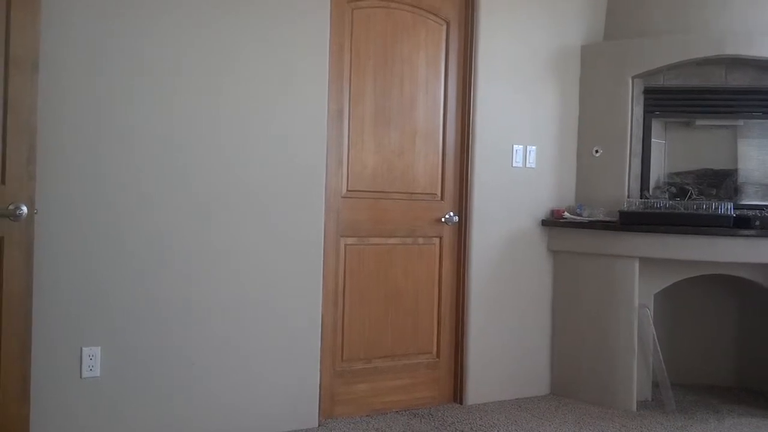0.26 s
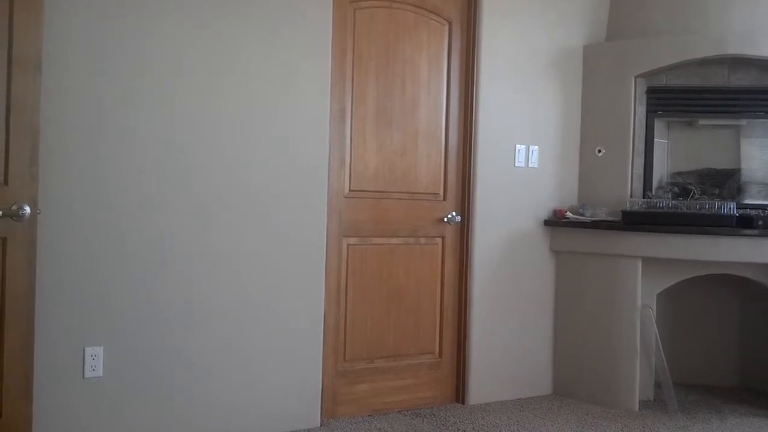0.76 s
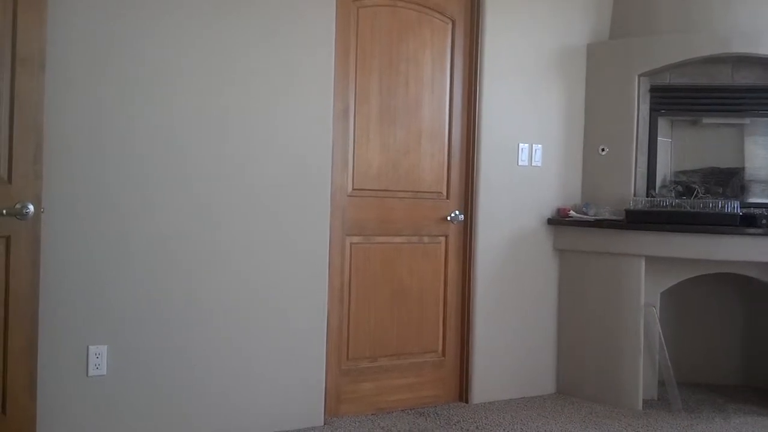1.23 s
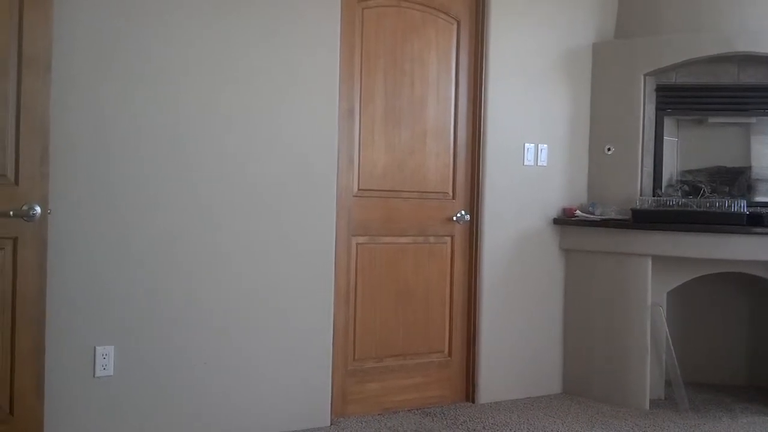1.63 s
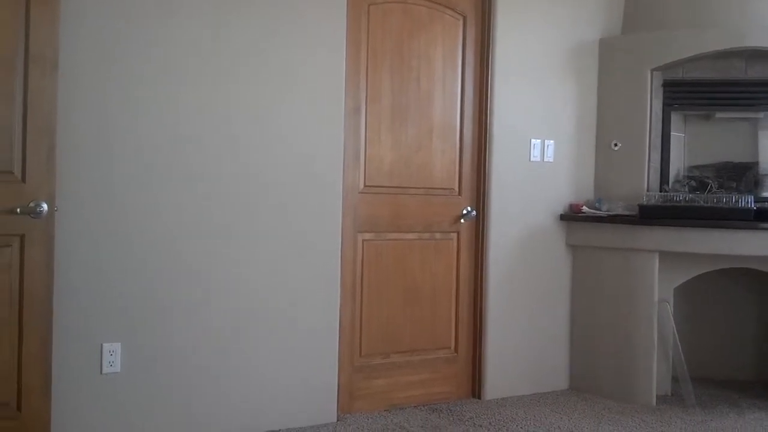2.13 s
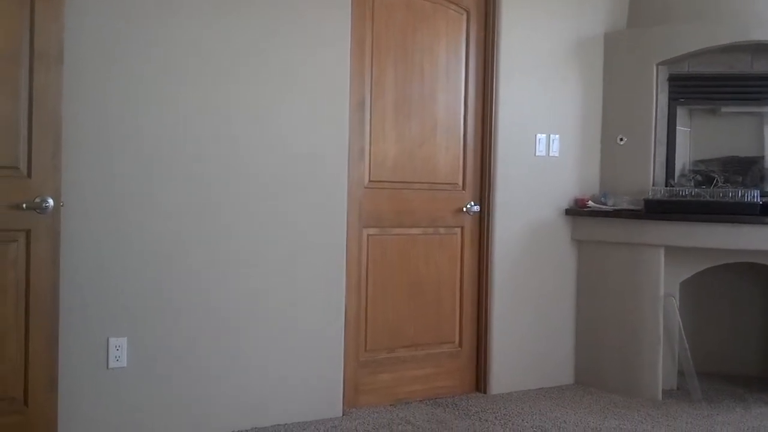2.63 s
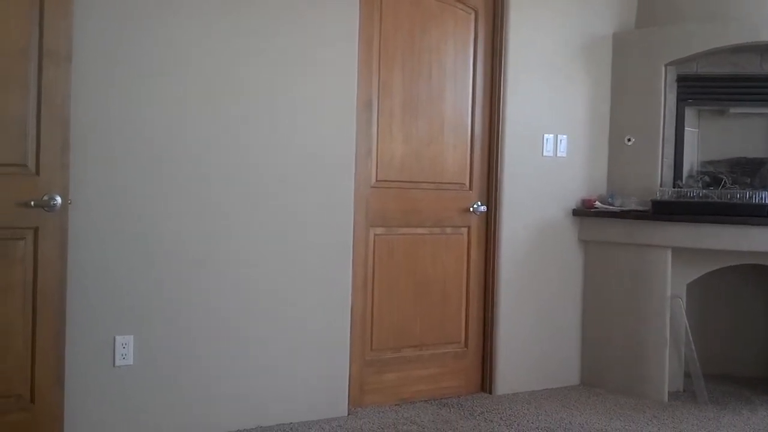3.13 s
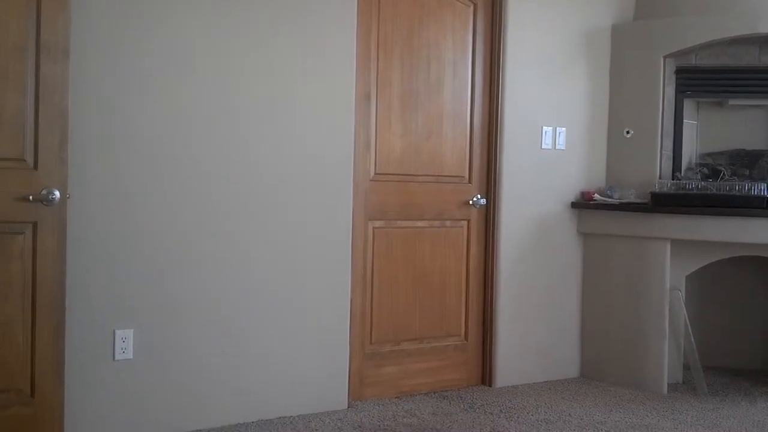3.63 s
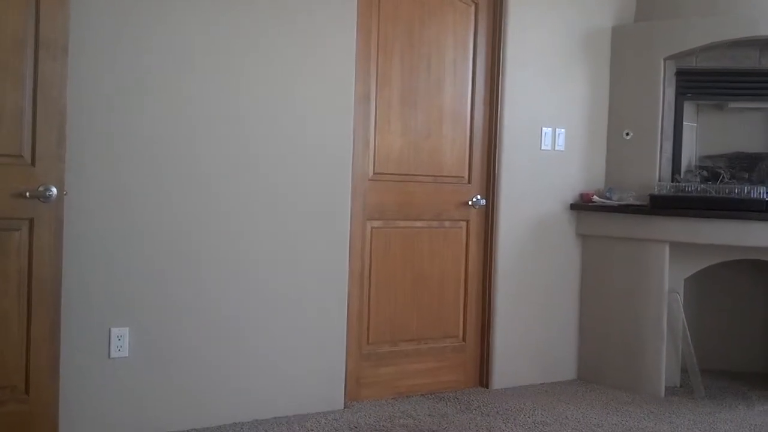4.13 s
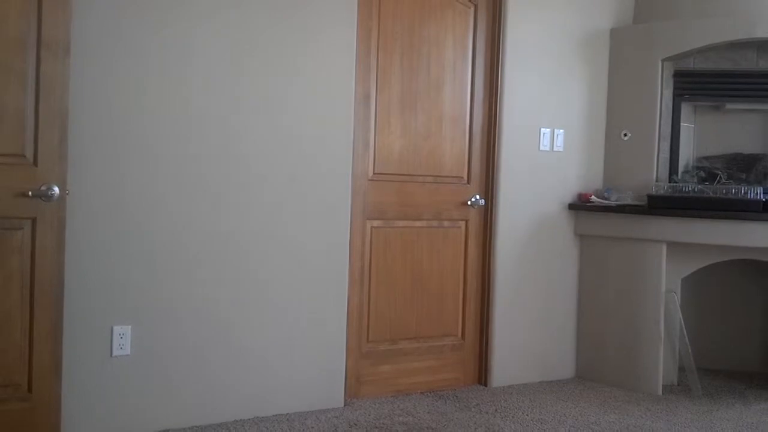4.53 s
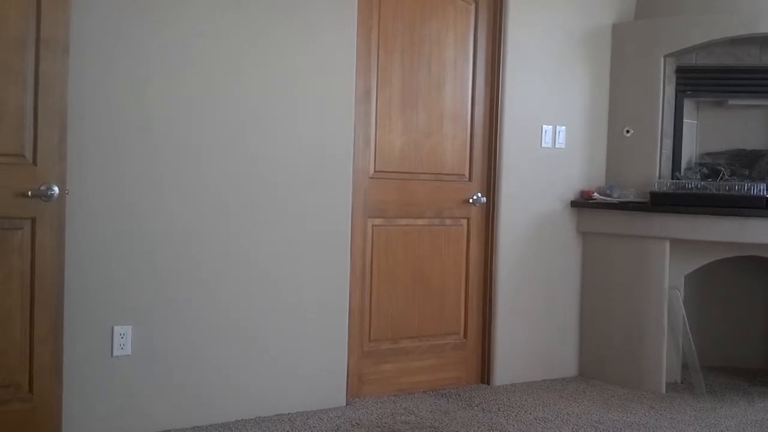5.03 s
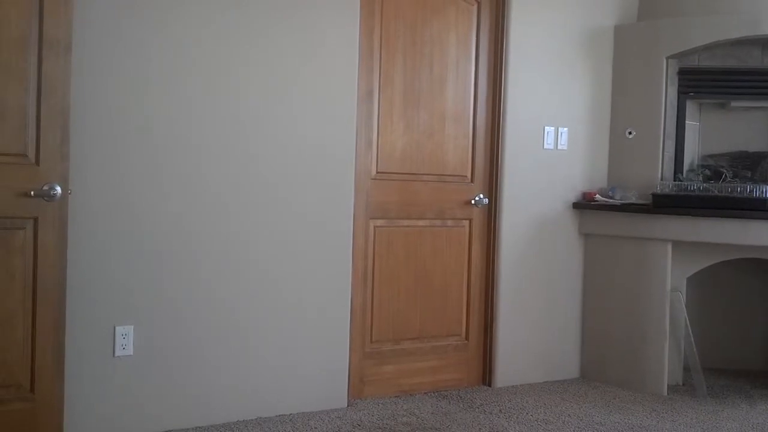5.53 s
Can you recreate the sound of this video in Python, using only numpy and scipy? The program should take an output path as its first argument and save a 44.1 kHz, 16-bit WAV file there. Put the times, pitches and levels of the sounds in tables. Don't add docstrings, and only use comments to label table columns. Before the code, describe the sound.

Loose interior door rattles at its latch: sharp metallic clacks and dull wooden knocks, a pause, one short jolt, then soft draught and hush.

```python
import sys
import numpy as np
from scipy import signal
from scipy.io import wavfile
from scipy.ndimage import uniform_filter1d

SR = 44100
rng = np.random.default_rng(int(sys.argv[2]) if len(sys.argv) > 2 else 0)


def level_to_linear(level):
    exponent = np.asarray(level, float) / 20
    return 10 ** exponent


def file_out(sig):
    cols = np.atleast_2d(sig).T
    lim = np.clip(cols, -1, 1)
    pcm = np.round(lim * 32767).astype(np.int16)
    wavfile.write(sys.argv[1], SR, pcm)


N = 254898

# start_s, level_db, plate_ring_db, handle_tick_db (the last two relative to the clack)
CLACKS = [(1.6829, -33.5, -26, -42), (1.6892, -33, -20, -41), (1.701, -22, -14.5, -17.5),
          (1.7214, -23.5, -13, -20), (1.752, -16, -9, -22), (1.8271, -25, -3, -21), (1.8444, -28, -1, -15),
          (1.8672, -13, -19, -28), (1.8901, -16.5, -16, -22.5), (1.9123, -13.5, -13.5, -34),
          (1.9654, -17.5, -26, -30), (1.9886, -28.5, -9, -39), (2.0044, -24, -22, -26),
          (2.0507, -23.5, -15.5, -27.5), (2.1258, -24.5, -11.5, -35), (2.1482, -40.5, -12, -12),
          (2.1804, -34, -6, -22), (2.3604, -30, -21, -43), (2.3686, -17, -12.5, -15),
          (2.4006, -15, -14.5, -42), (2.454, -11.5, -14, -30.5), (2.4738, -25.5, -11.5, -18),
          (2.5202, -13, -21.5, -37), (2.5569, -21, -10.5, -40), (2.5755, -21.5, -15.5, -27.5),
          (2.6288, -29, -24, -37), (3.8062, -12, -13.5, -29.5), (3.8243, -21, -6.5, -26),
          (3.8374, -22, -7, -25)]
LONE_TICKS = [
    (0.5272, -55.5, -18, -27),
    (2.8176, -54, 2.5, -7),
    (2.916, -54, -1.5, -21),
]
SQUARE_HITS = np.array([2.369, 3.806])

# pitch_hz, level_db, time_to_fall_60_db_s
TONGUE = [(1295, -8, 0.077), (1453, -3.5, 0.019), (1680, 9.5, 0.0079), (1841, -8, 0.074),
          (2043, -7.5, 0.027), (2143, -13, 0.067), (2420, -13, 0.035), (2940, -37, 0.0084)]
PLATE = [(2933, 3, 0.012), (3533, -3, 0.025), (3947, -7.5, 0.015), (4283, 4, 0.012), (5005, 0.5, 0.0099),
         (5650, 0.5, 0.006), (6260, -12, 0.0069), (7000, -39, 0.0038)]
HANDLE = [(7600, -3, .003), (8600, -2, .003), (9700, 0, .005), (10600, -2, .003), (11600, 0, .005),
          (12600, -2, .003), (13600, -2, .003), (14700, 0, .003), (15600, 0, .003)]
LATCH_WOOD = [(607, 4.5, 0.026), (723, -23, 0.36), (864, 4.5, 0.028), (935.6, -7, 0.11), (1090, 2, 0.039),
              (1097, -7, 0.014)]
PANEL = [(150, -6.5, 0.049), (185.7, -3, 0.12), (210, -7, 0.17), (258.6, -3, 0.13), (289, -4.5, 0.13),
         (334, -1.5, 0.087), (405, -1, 0.075), (505, -4.5, 0.078), (510, -6, 0.036)]
WHOLE_DOOR = [(64.6, -1, 0.084), (92.4, 3, 0.084), (107.5, -9, 0.17), (129.7, -0.5, 0.075)]
SPRING = [(12340, -4.5, .004), (14900, 2, 0.0086), (15600, 0, 0.0053)]
GAP = [(188, -18, 0.092), (266, 6.5, 0.015), (335, -3, 0.039), (389, -8, 0.1), (470, -8.5, 0.031),
       (645, -12, 0.027), (1240, -5, 0.02)]

# start_s, swing_period_s, first_level_db, change_per_knock_db,
# boom_db (relative to the knock)
KNOCK_RUNS = [(0.526, .03, -52.5, 0, -18), (1.692, .022, -23, -5.5, -24), (1.827, .03, -25, 0, -32),
              (1.865, .027, -18, -1.15, -27), (2.128, .061, -30, -8, -15),
              (2.371, 0.027, -25.5, 0.2, -25.5), (2.524, .03, -21.5, -2.5, -27.5),
              (3.807, .03, -30, 0, -5.5), (3.833, .021, -20, -5, -12), (4.001, .03, -54, 0, -8),
              (5.743, 0.032, -47, 0, -20)]
KNOCKS_IN_RUN = [1, 4, 1, 8, 2, 5, 5, 1, 4, 1, 1]
# start_s, hold_s, level_db
SPRING_BUZZES = [
    (1.713, 0.072, -49.5),
    (1.879, 0.038, -39.5),
    (1.949, 0.04, -39),
    (2.087, .02, -50),
    (2.374, .04, -48),
    (2.467, .01, -50),
    (2.533, 0.038, -45.5),
    (3.81, .04, -56),
]
# time_s, level_db
DRAUGHT = [(0, -83), (.45, -90), (.55, -56), (1, -56.5), (3.38, -55), (3.5, -43.5), (3.8, -42), (4, -60),
           (5, -75), (5.3, -57), (5.6, -55.5), (5.78, -48)]
# pitch_hz, time_to_fall_60_db_s
ROOM = [(60, 0.82), (150, 0.55), (400, 0.49), (1000, .42), (2500, 0.56), (6000, 0.46), (12000, 0.29)]
# pitch_hz, level_db_per_hz
HUSH = [(30, -102), (60, -78), (110, -68), (200, -76.5), (400, -78.5), (800, -86.5), (1500, -89.5),
        (2500, -91), (4500, -95.5), (7000, -99.4), (9500, -101.9), (12000, -100), (14000, -93),
        (15300, -94)]


def evened(x):
    return x / np.sqrt(np.mean(x ** 2) + 1e-20)


def read(points, hz):
    f, value = np.transpose(points)
    return np.interp(np.log(hz + 1), np.log(f + 1), value)


def add(mix, start_s, sound):
    part = mix[round(start_s * SR):][:len(sound)]
    part += sound[:len(part)]


def ring(modes, rise_s, chatter_s, slide_ms=0.76, spread=0.0491, count=4):
    hz, db, t60 = np.repeat(modes, count, 0).T[:, :, None]
    t = np.arange(round(min(t60.max(), .25) * SR)) / SR
    weight, detune = rng.standard_normal((2, len(hz), 1))
    db = db + 1.2 * weight
    tones = level_to_linear(db - 60 * t / t60) * np.sin(2 * np.pi * hz * (1 + spread * detune) * t)
    body = tones.sum(0) * (1 - np.exp(-t / rise_s))

    u = np.arange(1500) / SR
    shape = np.exp(-u / chatter_s) * (1 - np.exp(-1000 * u / slide_ms))
    touching = rng.random(len(u)) < .12
    contacts = rng.standard_normal(len(u)) * touching * shape
    contacts[0] = 2 * np.exp(-slide_ms)

    blow = signal.fftconvolve(body, contacts)
    return np.pad(blow, (0, SR // 3 - len(blow))) / abs(blow).max()


def latch():
    metal, ticks = np.zeros((3, N)), np.zeros(N)
    for k, (first_s, first_db, first_plate_db, tick_db) in enumerate(CLACKS + LONE_TICKS):
        square = abs(np.subtract(SQUARE_HITS, first_s)).min() < .004
        gap_s, loss_db = (.004, -4) if square else (.0125, -7.5)
        for bounce in range(2):
            start_s = first_s + bounce * gap_s
            db = first_db + bounce * loss_db
            plate_db = first_plate_db + bounce * 3
            wood_db = -9.5 - 0.21 * (db + 22) - 5.5 * square
            slide_ms = .15 if square and not bounce else 2.5

            tongue = ring(TONGUE, .0008, .004, slide_ms)
            plate = level_to_linear(plate_db + 4) * ring(PLATE, .00065, .0058, slide_ms, spread=.0763, count=7)
            wood = level_to_linear(wood_db + 4) * ring(LATCH_WOOD, .0049, .0047, slide_ms)
            add(metal[(k + bounce) % 3], start_s, level_to_linear(db + 4) * (tongue + plate + wood))

            tick = ring(HANDLE, .0002, .003, slide_ms / 3)
            add(ticks, start_s, level_to_linear(db + tick_db + 16.5 - 5 * bounce) * tick)
    return metal, ticks


def panel():
    uneven_s, uneven_db = .002, 1.5
    boom_delay = 600
    wood = np.zeros((3, N))
    for (start_s, period_s, first_db, step_db, boom_db), knocks in zip(KNOCK_RUNS, KNOCKS_IN_RUN):
        for k in range(knocks):
            late, strong = rng.standard_normal(2) * min(k, 1)
            boom = np.roll(ring(WHOLE_DOOR, .03, .0086, spread=.13, count=2), boom_delay)
            knock = ring(PANEL, .0029, .0017, count=2) + level_to_linear(boom_db + 15.5) * boom
            knock_s = start_s + k * period_s + uneven_s * late
            db = first_db + k * step_db + uneven_db * strong
            add(wood[k % 3], knock_s, level_to_linear(db + 7) * knock)
    return wood


def spring():
    rise_db_per_s, fall_db_per_s, ticks_per_s = 2000, 260, 4000
    size = level_to_linear(3.5 * np.minimum(rng.exponential(1, N), 4))
    ticks = size * rng.choice([-1, 1], N) * (rng.random(N) < ticks_per_s / SR)
    buzz = evened(signal.oaconvolve(ticks, ring(SPRING, .00013, .00035, spread=.022))[:N])
    t = np.arange(N) / SR
    loudness = np.zeros(N)
    for start_s, hold_s, db in SPRING_BUZZES:
        before_s = np.maximum(start_s - t, 0)
        after_s = np.maximum(t - start_s - hold_s, 0)
        loudness += level_to_linear(db + 8 - rise_db_per_s * before_s - fall_db_per_s * after_s)
    return buzz * loudness


def draught():
    time_s, db = np.transpose(DRAUGHT)
    gusts = evened(uniform_filter1d(rng.standard_normal(N), 1500))
    air = rng.standard_normal(N) * level_to_linear(1.5 * gusts)
    murmur = signal.oaconvolve(air, ring(GAP, .00045, .00019))[:N]
    return evened(murmur) * level_to_linear(np.interp(np.arange(N) / SR, time_s, db))


def bedroom(tracks):
    first, apart = 120, 16
    taps = np.zeros((3, SR))
    at = np.arange(first, SR - apart, apart) + rng.integers(0, apart, (3, (SR - first - 1) // apart))
    np.put_along_axis(taps, at, rng.choice([-1., 1.], at.shape), 1)
    hz, t, z = signal.stft(taps, SR, nperseg=512)
    fading = level_to_linear(-60 * t / read(ROOM, hz)[:, None])
    tail = signal.istft(z * fading, SR, nperseg=512)[1]
    tail *= np.arange(tail.shape[1]) > first
    tail /= np.linalg.norm(tail, axis=1, keepdims=True)
    return signal.fftconvolve(tracks, tail, axes=1)[:, :N].sum(0)


def hush():
    frames, hz = N // 256 + 5, np.fft.rfftfreq(1024, 1 / SR)
    a, b, patches = rng.standard_normal((frames, 513, 3)).T
    patches = uniform_filter1d(patches, 10, 0)
    patches = evened(uniform_filter1d(patches, 12, 1))
    z = (a + 1j * b) * level_to_linear(read(HUSH, hz)[:, None] + 0.75 * patches)
    noise = signal.istft(z, nperseg=1024, noverlap=768)[1][:N]
    return level_to_linear(-46.5) * evened(noise)


def scene():
    metal, ticks = latch()
    wood = panel()
    direct = level_to_linear(2.5) * metal.sum(0) + level_to_linear(-2) * wood.sum(0) + ticks
    echo = bedroom(level_to_linear(2) * metal + level_to_linear(5) * wood + level_to_linear(-8) * ticks)
    return np.tile(direct + echo + spring() + draught() + hush(), (2, 1))


def low_pass(x):
    return signal.sosfilt(signal.butter(12, 16990, fs=SR, output="sos"), x)


def record(dry):
    threshold_db, release_db_per_s, lag_s, strength = -27, 20.7, .0092, .39
    bass_cut_hz, treble_cut_hz, late_samples = 127, 16200, 16
    power_db = 10 * np.log10(abs(uniform_filter1d(dry[0] ** 2, size=40)) + 1e-12)
    fall = np.arange(N) * release_db_per_s / SR
    held_db = np.maximum.accumulate(power_db + fall) - fall
    over_db = np.maximum(held_db - threshold_db, 0)
    lag = np.exp(-1 / (lag_s * SR))
    ducked = dry[0] / level_to_linear(strength * signal.lfilter([1 - lag], [1, -lag], over_db))
    ducked = .55 * np.tanh(ducked / .55)

    thin = signal.sosfilt(signal.butter(2, bass_cut_hz, "high", fs=SR, output="sos"), ducked)
    treble_cut = signal.firwin(511, treble_cut_hz, window=("kaiser", 9), fs=SR)
    left = signal.oaconvolve(thin, treble_cut, "same")
    right = -level_to_linear(.35) * np.pad(left, (late_samples, 0))[:N]
    return low_pass(np.array([left, right]))


dry = scene()
out = record(dry)
file_out(out)
```